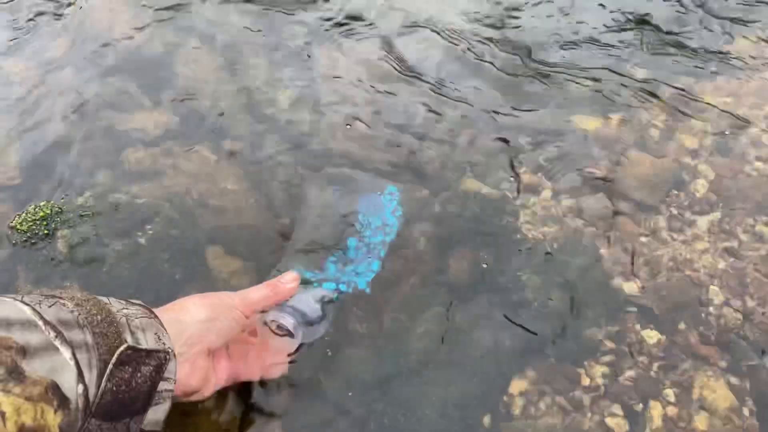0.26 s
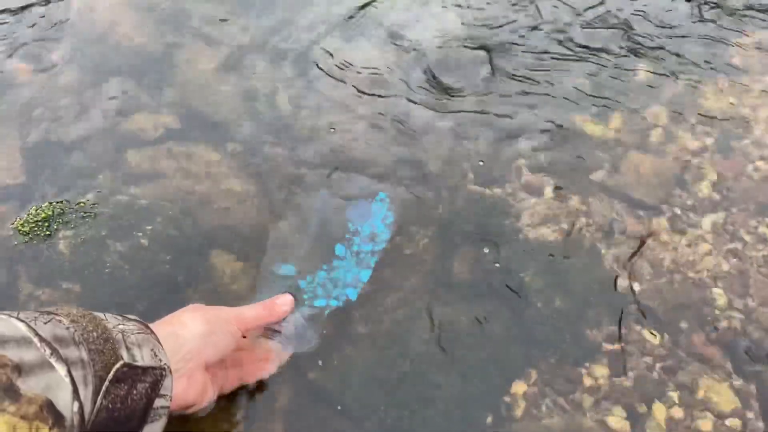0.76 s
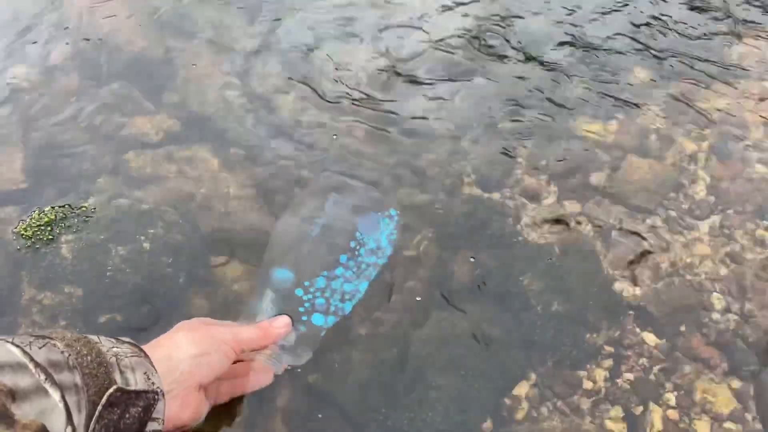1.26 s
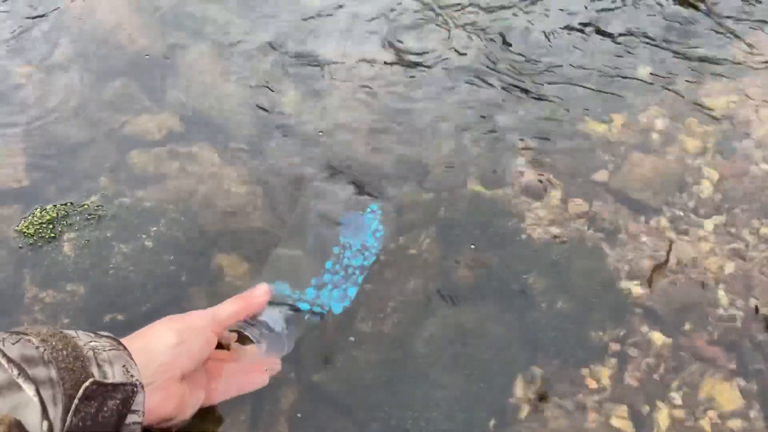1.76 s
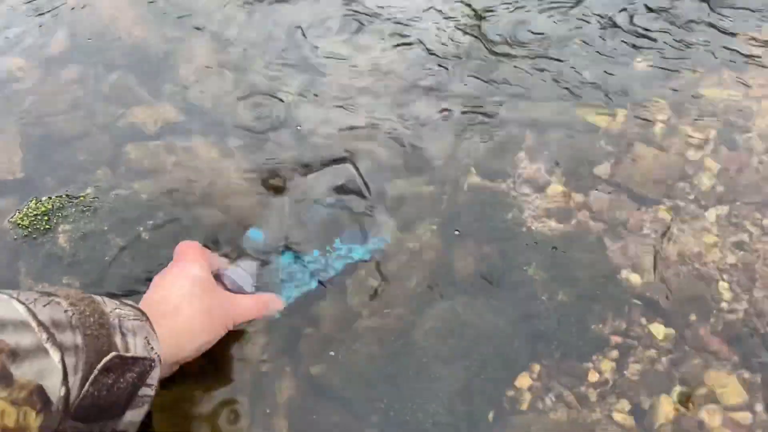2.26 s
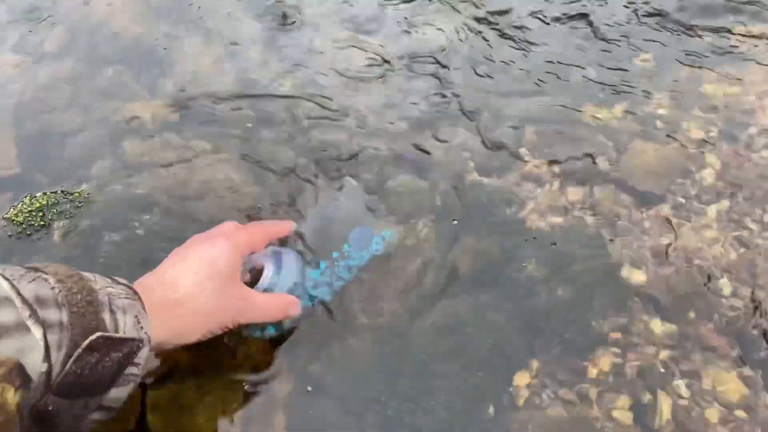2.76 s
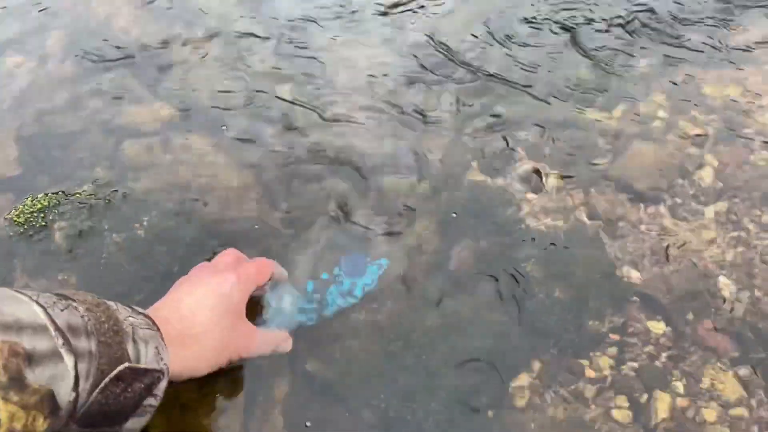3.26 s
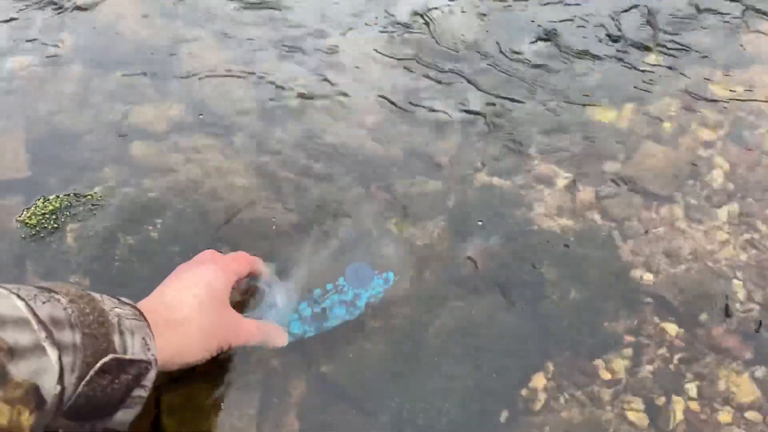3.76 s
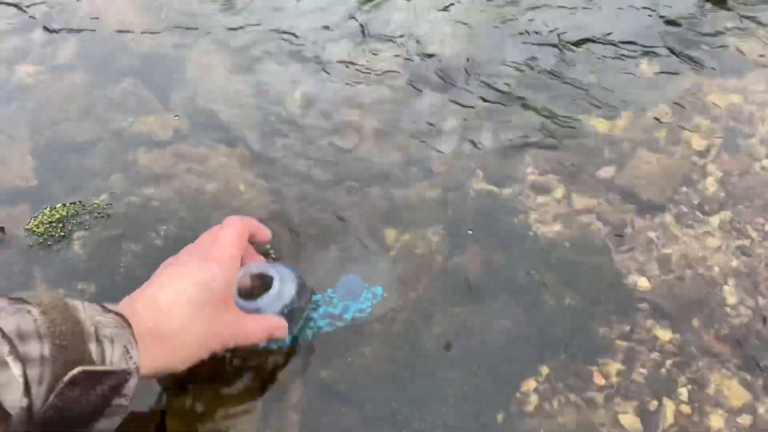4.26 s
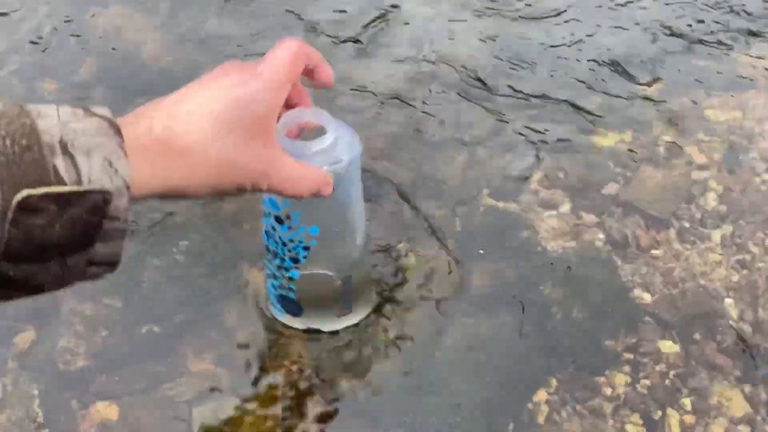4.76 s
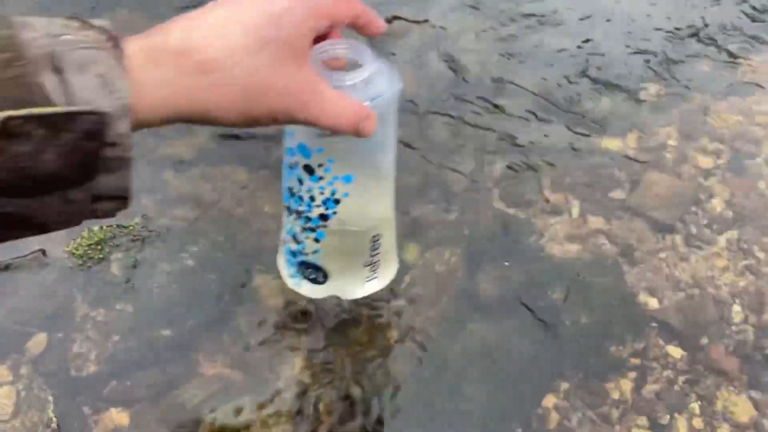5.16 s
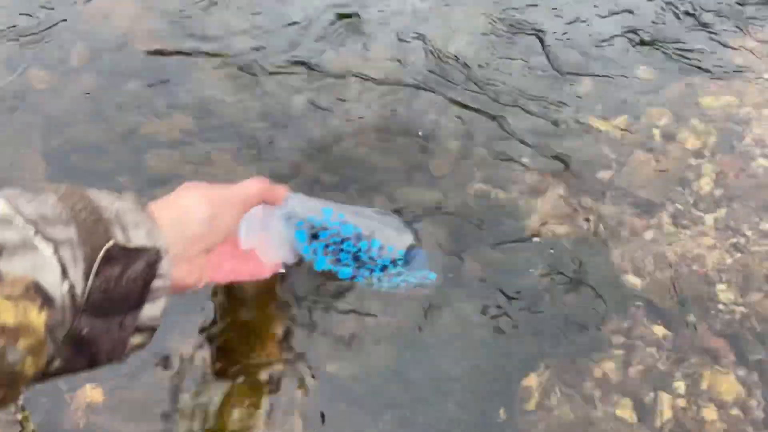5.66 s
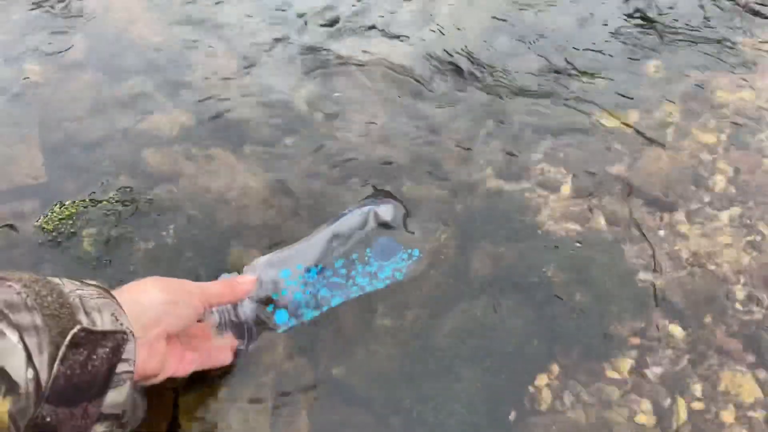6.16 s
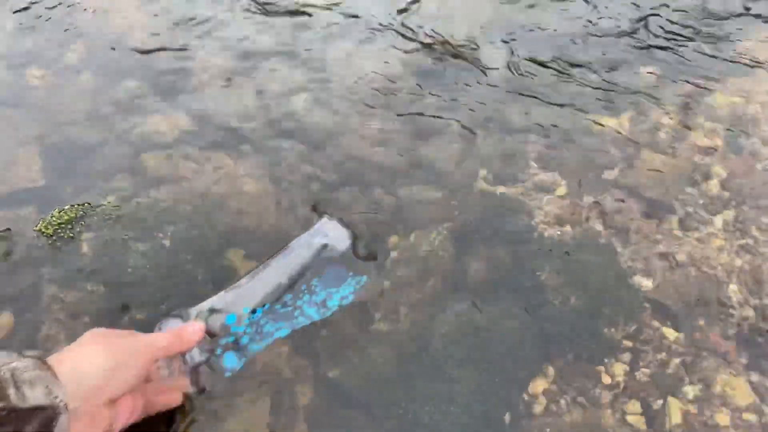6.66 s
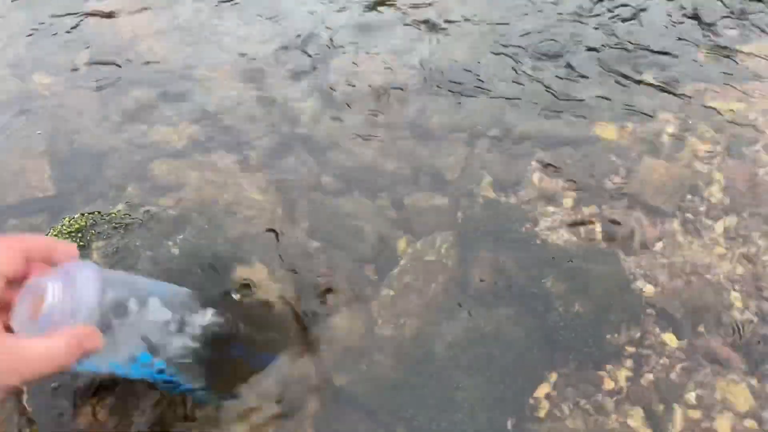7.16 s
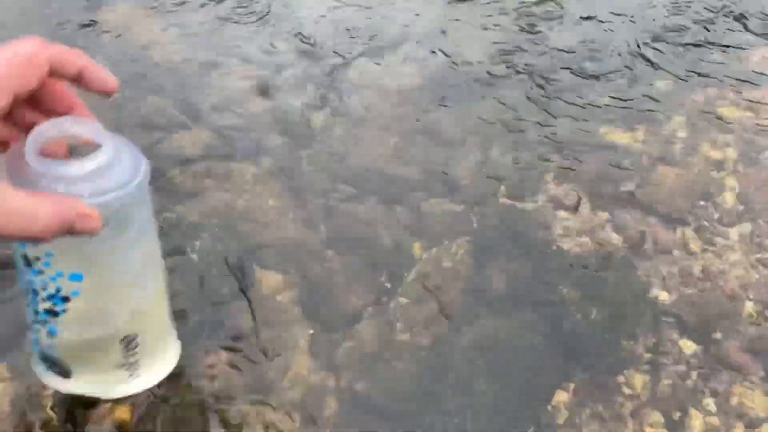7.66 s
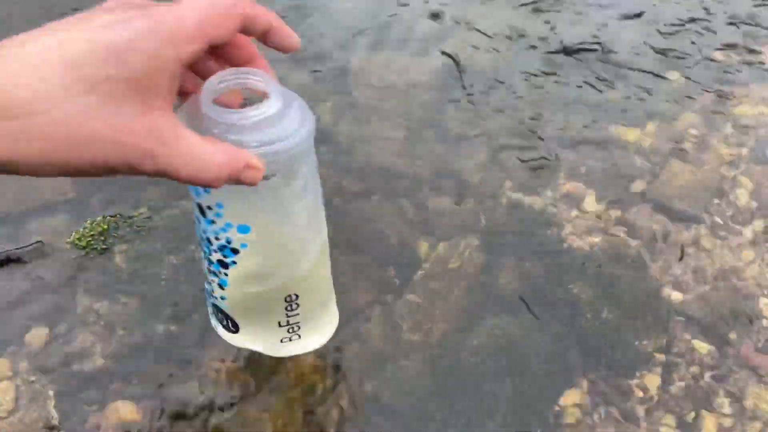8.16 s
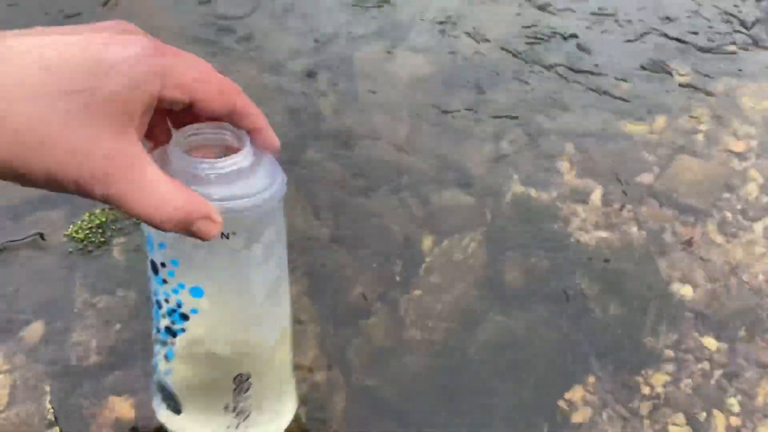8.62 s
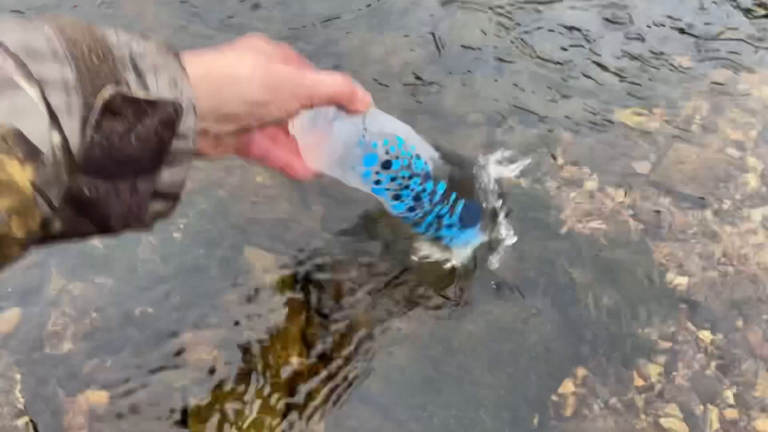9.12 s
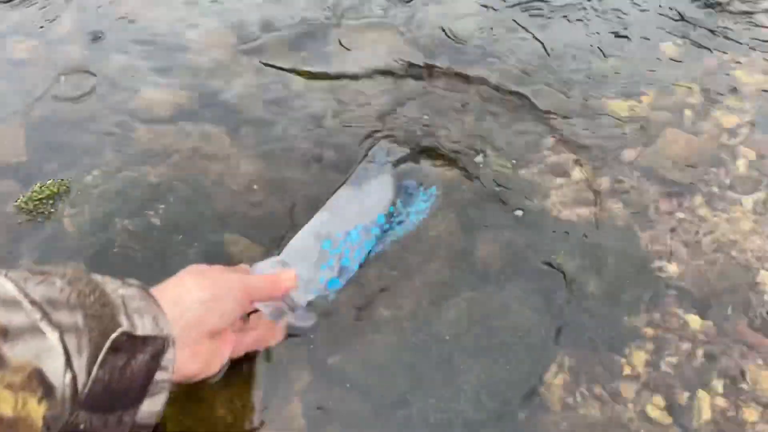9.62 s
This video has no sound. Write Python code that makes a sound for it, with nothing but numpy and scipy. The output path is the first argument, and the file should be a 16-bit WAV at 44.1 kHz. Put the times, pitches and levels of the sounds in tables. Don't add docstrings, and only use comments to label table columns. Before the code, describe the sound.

Close bubbling stream water with a sharp early knock, light splashes as a soft flask is dipped and lifted, and heavy wind buffeting later.

```python
import sys
import numpy as np
from scipy import signal
from scipy.fft import rfft, irfft
from scipy.io import wavfile
from scipy.ndimage import uniform_filter1d, minimum_filter1d

SR = 44100
rng = np.random.default_rng(int(sys.argv[2]) if len(sys.argv) > 2 else 0)


def store_pcm(level_fs):
    pcm = np.round(np.clip(level_fs, -1, 1) * 32767).astype(np.int16)
    wavfile.write(sys.argv[1], SR, np.atleast_2d(pcm).T)


def magnitude_from_level(level_db):
    exponent = np.asarray(level_db, float) / 20
    return 10 ** exponent


N = 436149


def evened(x):
    return x / np.sqrt(np.mean(x ** 2) + 1e-20)


def coloured(x, spectrum):
    hz = np.fft.rfftfreq(N, 1 / SR)
    point_hz, point_db = np.transpose(spectrum)
    gain_db = np.interp(np.log(hz + 1), np.log(point_hz), point_db, -90, -90)
    return evened(irfft(rfft(x) * magnitude_from_level(gain_db), N))


def curve(rows, column):
    rows = np.array(rows)
    return np.interp(np.arange(N) / SR, rows[:, 0], rows[:, column])


def flicker(hz, depth_db):
    knots = rng.standard_normal(N // 200 + 2)
    smooth = uniform_filter1d(knots, int(220 / hz) + 1)
    slow = evened(uniform_filter1d(smooth, int(110 / hz) + 1))
    wander = np.interp(np.arange(N) / 200, np.arange(len(knots)), slow)
    return evened(magnitude_from_level(depth_db * wander))


def add(mix, start_s, sound):
    part = mix[:, round(start_s * SR):][:, :sound.shape[-1]]
    part += sound[..., :part.shape[-1]]


# pitch_hz, right_lead_turns, likeness (0-1)
PORT_PAIR = [(0, 0, .8), (350, .05, .6), (550, .4, .7), (1150, .43, .7), (1450, .53, .9), (1900, .98, .6),
             (2800, 1.08, .7), (3300, 1.43, .6), (4700, 2.0, .85), (5700, 2.4, .3), (6500, 3.07, .75),
             (8200, 3.5, .93), (11600, 4.0, .93), (14800, 4.5, .93)]


def ports(near, other=None):
    hz = np.fft.rfftfreq(N, 1 / SR)
    point_hz, lead_turns, likeness = np.transpose(PORT_PAIR)
    right = rfft(near) * np.exp(2j * np.pi * np.interp(hz, point_hz, lead_turns))
    if other is not None:
        same = np.interp(hz, point_hz, likeness)
        right = same * right + np.sqrt(1 - same ** 2) * rfft(other)
    return np.array([near, irfft(right, N)])


def bubbles(lo_hz, hi_hz, per_s, cycles, spread_db, count=24):
    out = np.zeros(N)
    size = magnitude_from_level(spread_db * np.minimum(rng.exponential(1, N), 5))
    size = size * (rng.random(N) < per_s / SR)
    kind = rng.integers(0, count, N)
    for k, hz in enumerate(np.geomspace(lo_hz, hi_hz, count)):
        u = np.arange(int(3 * cycles * SR / hz)) * hz / SR / cycles
        rising = np.sin(2 * np.pi * cycles * (u + .012 * u ** 2))
        grain = u ** 2 * np.exp(-4 * u) * rising
        out += signal.oaconvolve(size * (kind == k), grain * hz / 1000)[:N]
    return evened(out)


def water(lo_hz, hi_hz, per_s, cycles, spread_db, wash):
    return bubbles(lo_hz, hi_hz, per_s, cycles, spread_db) + wash * rng.standard_normal(N)


# pitch_hz, level_db (per Hz)
FIZZ_COLOUR = [(150, -63), (220, 13.5), (900, -3.5), (1150, 8), (1500, 6.5), (2000, 3.5), (2600, 1),
               (3300, -4.5), (4500, -5), (6000, -13.5), (7800, -14.5), (11500, -19.5), (14800, -22),
               (16500, -9)]
# pitch_hz, level_db (per Hz)
CHURN_COLOUR = [(120, -30), (200, 9.5), (300, -8), (500, 4.5), (850, 5), (1100, -12)]
# start_s, breeze_db, stir_db
WEATHER_COURSE = [(0, -53, -39), (.75, -50, -45), (.85, -55.5, -50.5), (1.25, -66, -56), (1.7, -60, -49),
                  (2.3, -58, -38), (2.9, -54, -40.5), (3.3, -41.5, -39.5), (4.2, -49.5, -38),
                  (5.1, -56, -37), (5.6, -42.5, -39.5), (5.85, -61, -38), (6.25, -50, -39),
                  (6.85, -45, -37.5), (7.0, -58, -35.5), (8.3, -46, -46), (8.9, -48.5, -44),
                  (9.89, -47, -40)]


def brook():
    churn_top_db = -44.5
    fizz, churn = [], []
    for _ in "LR":
        spatter = 1.69 * bubbles(5180, 15200, 5000, 4.1, 1.8, count=10)
        fizz.append(coloured(water(885, 6977, 2500, 14.5, 3.92, 1.52) + spatter, FIZZ_COLOUR))
        churn.append(coloured(water(181.5, 989.6, 300, 12.0, 1.77, 0.79), CHURN_COLOUR))
    stir_db = curve(WEATHER_COURSE, 2)
    fizz_db = -47 + 0.077 * (stir_db - churn_top_db)
    churn_db = np.minimum(stir_db, churn_top_db) + 3.0
    balance = magnitude_from_level(np.array([[.6], [-.6]]))
    fizz = ports(*fizz) * balance * magnitude_from_level(fizz_db) * flicker(30, 1.0)
    return fizz + ports(*churn) * magnitude_from_level(churn_db) * flicker(2.2, 0.37)


# start_s, length_s, rumble_db, rushing_db
WIND_PUFFS = [(0, 0.1, -40.5, -50), (0.12, .06, -41, -50), (1.0, .2, -55, -60), (1.8, .1, -60, -40),
              (5.0, .08, -55, -38), (7.5, .09, -44, -50), (8.45, .2, -42, -60), (0.524, 0.23, -49, -42.5),
              (3.31, .09, -36, -41), (3.46, 0.4, -41, -56), (3.912, 0.17, -36, -40), (4.088, 0.1, -35, -55),
              (4.329, 0.09, -35.5, -41), (4.6, 0.15, -34.5, -59), (4.847, 0.063, -38, -44),
              (5.2, 0.08, -32, -61), (5.36, 0.1, -36, -50), (5.685, 0.097, -51, -39), (6.2, .08, -42, -45),
              (6.31, .04, -30, -36), (6.59, .05, -35, -36), (6.72, .04, -38, -40), (6.81, .04, -38, -42),
              (6.395, 0.12, -29.5, -55), (6.52, 0.06, -33, -38), (6.65, 0.045, -29, -40),
              (6.764, .035, -31, -49), (6.863, .035, -35, -49), (7.085, 0.06, -54, -32.5),
              (7.68, 0.075, -31, -32.5), (7.86, 0.17, -36.5, -34), (8.03, .2, -32, -30),
              (8.4, 0.04, -36, -41), (8.67, .1, -37.5, -57), (8.959, 0.092, -43, -34),
              (9.207, 0.041, -43, -40), (9.507, .12, -36.5, -38), (9.68, 0.075, -50, -40),
              (9.843, 0.043, -41, -47)]


def puffs(column):
    rise_s, fall_s = 0.056, 0.016
    t, power = np.arange(0, N, 64) / SR, 0
    for row in WIND_PUFFS:
        start_s, length_s = row[:2]
        rise = (t - start_s) / rise_s + .5
        fall = (start_s + length_s - t) / fall_s + .5
        shape = np.clip(np.minimum(rise, fall), 0, 1)
        power = power + magnitude_from_level(2 * row[column]) * np.sin(np.pi / 2 * shape) ** 4
    return np.interp(np.arange(N) / SR, t, power)


# pitch_hz, level_db (per Hz)
RUMBLE_COLOUR = [(15, -42), (35, -4.5), (60, 5.5), (100, 1.5), (160, -5), (260, -16), (500, -44)]
# pitch_hz, level_db (per Hz)
GUST_COLOUR = [(100, -18.5), (220, -3.5), (400, -13.5), (700, -19), (1200, -31.5)]
# start_s, peak_db,
# pitch_hz, length_cycles
PORT_EDDIES = [(0.554, -26, 65.4, 0.91), (0.651, -24.5, 191, 5.6), (0.83, -36, 278, 2.8),
               (1.053, -33, 217, 2.7), (2.763, -27.5, 197, 3.9), (3.332, -18, 116, 1.8),
               (3.38, -15.5, 96, 1.5), (3.669, -27, 157, 2.2), (3.929, -21, 229, 4.8),
               (4.341, -25, 53.4, 1.3), (4.706, -25, 104, 1.2), (4.848, -24.5, 84.4, 1.6),
               (6.293, -12.5, 175, 2.6), (6.422, -14, 84, 1.9), (6.558, -11.5, 68, 1.1),
               (6.866, -11.5, 99.6, 1.15), (7.151, -24, 110, 1.7), (7.686, -15, 128, 3.3),
               (7.727, -7.5, 88, 0.87), (7.851, -19, 72, 2), (8.087, -13, 127.5, 2.2),
               (8.394, -18, 88, 1.3), (8.551, -21, 152, 2.3), (8.952, -21, 109.5, 2),
               (7.245, -24, 125, 1.6), (8.192, -12, 100, 1.5), (9.002, -22, 165, 1.7),
               (9.226, -19, 170, 1.2), (9.216, -25, 92.5, 1.8),
               (7.642, -21, 227, 1.2), (7.692, -11.5, 247, 1.9), (7.703, -24, 266, 1),
                (7.733, -11, 350, 1.4), (7.741, -4, 272, 1.37), (7.841, -14, 202, 0.95),
                (7.874, -14.5, 259, 1.4), (7.91, -19.5, 231, 1.4), (7.951, -11, 335, 1.94),
                (7.982, -12, 263, 0.79), (8.003, -15, 262, 1.5), (8.061, -10, 430, 1.6),
                (8.083, -11, 208, 2.4), (8.095, -10, 433, 1.6), (8.106, -10.5, 306, 2.6),
                (8.119, -24, 265, 1.5), (8.137, -21, 410, 1.1), (8.15, -15.5, 205, 2.7),
                (8.163, -6, 420, 2.2), (8.19, -16, 296, 1.3), (8.209, -16, 230, 1.2), (7.693, -22, 560, 3),
                (7.857, -22, 450, 2), (7.873, -20, 540, 2.5), (7.909, -15, 480, 1.6),
                (7.968, -17, 240, 1.5), (8.025, -20, 300, 2.5), (8.112, -13, 520, 2.5),
                (8.084, -20, 520, 2), (8.135, -22, 500, 2.5), (8.978, -26, 330, 3)]


def wind():
    rumble = coloured(rng.standard_normal((2, N)), RUMBLE_COLOUR)
    gust = coloured(rng.standard_normal((2, N)), GUST_COLOUR)
    rumble_power = magnitude_from_level(2 * curve(WEATHER_COURSE, 1)) + puffs(column=2)
    stir_power = magnitude_from_level(2 * curve(WEATHER_COURSE, 2)) - magnitude_from_level(2 * -45.5)
    gust_power = np.maximum(stir_power, 0) + puffs(column=3)
    rumble = rumble[0] + np.outer([1, -1], 0.33 * rumble[1])
    gust = gust[0] + np.outer([1, -1], 0.66 * gust[1])
    out = rumble * np.sqrt(rumble_power) * flicker(16, 2.2)
    out = out + gust * np.sqrt(gust_power) * magnitude_from_level(-5.5) * flicker(70, 3.4)
    eddies = PORT_EDDIES
    for (start_s, db, hz, cycles), (turn, lag) in zip(eddies, rng.random((len(eddies), 2))):
        u = np.arange(int(2 * cycles * SR / hz)) * hz / SR / cycles
        phase = 2 * np.pi * (cycles * u + turn + np.outer([1, -1], 0.077 * (lag - .5)))
        steepness = 0.38 * (hz > 190)
        swirl = np.sin(phase) + steepness * np.sin(1.604 * phase)
        add(out, start_s, magnitude_from_level(db - 8.5) * np.sin(np.pi * u / 2) ** 2 * swirl)
    return out


# start_s, peak_db, pitch_hz (bubble), crack_db (re peak), length_s
CRACKING_DROPS = [(0.083, -27, 3270, -2, 0.0092), (.094, -32, 4230, 0, 0.0065),
                  (.102, -25, 8450, -3, 0.003), (0.273, -37, 4500, -20, .005), (1.674, -39, 4600, 5, .0026),
                  (2.982, -28, 4500, 4, .0035), (3.073, -39, 5360, 3, 0.0028),
                  (5.374, -26, 11000, -8, .0015), (4.603, -33, 3000, 0, .002),
                  (4.611, -22, 4500, 5.5, 0.0025), (4.616, -22, 5800, -6, .003),
                  (5.539, -31, 5200, -5, .004), (5.792, -28, 5600, -3, .003),
                  (5.414, -29, 8550, -14, .0025), (5.5, -28, 4500, -8, 0.0036),
                  (5.541, -36, 6500, 0, .0025), (5.788, -26, 5330, -6, 0.003),
                  (5.799, -23, 5940, -7, 0.003), (8.001, -28, 2520, -16, 0.0037),
                  (8.034, -20, 3400, -25, 0.0046), (9.068, -29, 5440, -5, 0.0024),
                  (9.178, -22.5, 7000, -7, 0.0054), (9.21, -22, 2700, -6, 0.004),
                  (9.217, -22, 3240, -3, 0.0029), (9.297, -25, 3700, -6, 0.0059)]
# start_s, peak_db, pitch_hz (bubble), spray_db (re peak)
SPRAY_FLECKS = [(.083, -27, 5920, -10), (.295, -43, 8950, -14), (1.338, -33, 14000, -12),
                (1.361, -33, 4430, -13), (2.899, -38, 6900, -10), (4.504, -46, 14000, -10),
                (4.518, -43, 6800, -8), (4.575, -42, 10000, -10), (4.586, -43, 8000, -3),
                (4.61, -39, 4800, -1), (4.596, -35, 10900, -6), (4.707, -38, 4800, -5),
                (5.373, -33, 13200, 3), (5.382, -33, 4600, -16), (7.091, -34, 5400, -13),
                (7.098, -46, 12000, -6), (7.106, -40, 7250, -3), (7.19, -37, 9400, -9),
                (7.203, -40, 14500, -7), (9.19, -35, 7500, -8), (9.193, -28, 5900, -16),
                (9.318, -35, 4500, -7)]


def splashes():
    out, t = np.zeros((1, N)), np.arange(1500) / SR
    fine = signal.butter(3, [8000, 15500], "band", fs=SR, output="sos")
    coarse = signal.butter(2, [1500, 8000], "band", fs=SR, output="sos")
    rows = [(s, db, hz, -22, crack_db, length_s) for s, db, hz, crack_db, length_s in CRACKING_DROPS]
    rows += [(s, db, hz, spray_db, -18, .004) for s, db, hz, spray_db in SPRAY_FLECKS]
    noises = rng.standard_normal((len(rows), 1500))
    for (start_s, db, hz, spray_db, crack_db, length_s), noise in zip(rows, noises):
        u = t / np.clip(length_s, .001, .02)
        spray = magnitude_from_level(spray_db + 1.0) * signal.sosfilt(fine, noise) * np.exp(-(u / .9) ** 2)
        impact = noise * np.exp(-t / .0015) + 2.5 * (t == t[20])
        crack = magnitude_from_level(crack_db) * signal.sosfilt(coarse, impact)
        wobble = 1 + 3.8 * uniform_filter1d(noise[::-1], size=30)
        ring = .5 * wobble * np.sin(2 * np.pi * hz * t * (1 + 0.014 * u)) * np.exp(-1.5 * u)
        onset = 1 - np.exp(-t / .00025)
        add(out, start_s, magnitude_from_level(db) * onset * (spray + crack + ring))
    return ports(out[0]) * magnitude_from_level(np.array([[1.2], [-1.2]]))


# start_s, peak_db, pitch_hz, length_s, pitch_rise (per length)
AIR_POCKETS = [(9.176, -37, 1420, 0.0025, 0.005), (.064, -40, 2400, .006, .003),
               (.103, -38, 2300, .002, .003), (9.271, -41, 2500, .003, .003), (5.45, -40, 2100, .002, .003),
               (9.199, -42, 2450, .003, .005), (9.018, -42, 1700, .004, .015),
               (9.021, -38, 590, .012, .003), (9.069, -38, 1080, .0015, .01), (7.395, -39, 495, .013, .005),
               (7.18, -41, 590, .01, -.02), (7.295, -41, 440, .012, .01), (7.107, -38, 270, .01, .01),
               (7.28, -36, 215, .012, .01), (2.169, -41.5, 2250, .003, -0.0077),
               (2.189, -39.5, 2220, .004, 0.0066), (2.901, -33, 550, 0.0024, -0.011),
               (2.9, -39, 1140, .002, -0.025), (2.979, -27, 890, 0.0026, -0.004),
               (2.985, -37, 2630, 0.0016, -0.011), (3.089, -42, 1800, .004, 0.044),
               (3.248, -39, 470, 0.023, 0.055), (7.097, -38, 570, 0.012, 0.02),
               (4.603, -37, 1790, 0.0034, -0.012), (4.617, -39, 1720, 0.0064, -0.006),
               (5.449, -30.5, 860, 0.0023, 0.027), (5.987, -31.5, 980, 0.001, 0.0066),
               (7.375, -35, 860, 0.0031, 0.0052), (7.804, -40.5, 830, 0.01, 0.0077),
               (8.992, -33, 750, 0.0028, 0.023), (9.069, -36, 1750, 0.0015, -0.0058),
               (9.18, -34, 2540, .002, 0.018), (9.191, -34, 830, 0.006, 0.11),
               (9.217, -32, 2050, .002, -0.03), (9.222, -38, 1670, 0.007, 0.03),
               (9.131, -38, 560, .012, .005), (9.151, -36, 700, .005, .03), (9.445, -38, 538, 0.018, 0.023)]


def glugs():
    out, t = np.zeros((2, N)), np.arange(6000) / SR
    port_phase = np.array([[0], [.9]])
    for start_s, db, hz, length_s, rise in AIR_POCKETS:
        u = t / np.clip(length_s, .001, .02)
        ring = np.sin(2 * np.pi * hz * t * (1 + rise * u) + port_phase)
        add(out, start_s, magnitude_from_level(db + 9.0) * (1 - np.exp(-4 * u)) * np.exp(-u) * ring)
    return out


# low_hz, high_hz, half (0 mid, 1 side), share (of moments)
MUTED_BANDS = [(7520, 8980, 0, 1), (13700, 23000, 0, 1), (10300, 13000, 1, 1), (15750, 23000, 1, 1),
               (6250, 6750, 1, .3), (4700, 5000, 1, .12)]
# start_s, kept_to_hz
SPARED_MOMENTS = [(.1, 16000), (.112, 15800), (.3, 15800), (.41, 15800), (1.065, 10000), (1.338, 16400),
                  (2.9, 15800), (2.983, 16500), (4.51, 15800), (4.58, 15000), (4.61, 16500), (5.375, 16500),
                  (5.415, 15800), (5.54, 15800), (5.79, 15800), (7.1, 15800), (7.2, 15800), (8.034, 14200),
                  (9.068, 15800), (9.18, 14200), (9.32, 15500), (9.34, 15000)]
# pitch_hz, share (of patches)
MUTED_PATCHES = [(2000, 0), (5000, .02), (9000, .07), (14000, .13)]


def thinned(pair):
    halves = np.array([pair[0] + pair[1], pair[0] - pair[1]]) / 2
    hz, t, halves = signal.stft(halves, SR, nperseg=2048)
    spared_hz = np.max([top * (abs(t - s) < .0125) for s, top in SPARED_MOMENTS], axis=0)
    keep = np.ones(halves.shape)
    for lo_hz, hi_hz, half, share in MUTED_BANDS:
        on, low, high = np.repeat(rng.standard_normal((len(t), 3)), 2, axis=0)[:len(t)].T
        low_edge = lo_hz + 170 * np.round(.6 * low)
        high_edge = hi_hz + 170 * np.round(.6 * high)
        inside = (hz[:, None] > np.maximum(low_edge, spared_hz)) & (hz[:, None] < high_edge)
        keep[half] *= 1 - inside * (on <= np.quantile(on, share))
    cells = rng.random((2, len(t) // 3 + 1, len(hz) // 6 + 1))
    cells = cells.repeat(3, axis=1).repeat(6, axis=2)[:, :len(t), :len(hz)]
    holes = cells.transpose(0, 2, 1) < np.interp(hz, *np.transpose(MUTED_PATCHES))[:, None]
    kept = halves * keep * ~(holes & (spared_hz == 0))
    mid, side = signal.istft(kept, SR, nperseg=2048)[1][:, :N]
    return np.array([mid + side, mid - side])


# start_s, peak_db, first_half_wave_s (sign is direction), swell_steepness, die_away_s,
# shell_ring_db, tick_db
CASE_KNOCKS = [
    (.4097, 2.5, .0015, 1.3, .0036, -4, -17),
    (1.0637, -20.5, -.00084, .2, .0025, -40, -40),
]


def knocks():
    half_wave_growth = 1.535
    out, t = np.zeros((2, N)), np.arange(1, 4000) / SR
    for start_s, db, first_s, steepness, die_s, ring_db, tick_db in CASE_KNOCKS:
        late = t / np.array([[1.08], [1]])
        u = late / abs(first_s)
        chirp = np.cos(np.pi * np.log(u) / np.log(half_wave_growth))
        bend = np.sign(first_s) * chirp * u ** 3 / (.3 + u ** 3)
        swell = (late / die_s) ** steepness * np.exp(-late / die_s)
        add(out, start_s, magnitude_from_level(db + 3.5) * bend * (swell + 0.1 * np.exp(-late / 0.025)))
        d = t - .01
        flip = 1.12 * np.exp(-(d / .0004) ** 2) - .12 * np.exp(-(d / .01) ** 2)
        ring = np.where(d < 0, np.exp(d / .0018), flip) * np.cos(2 * np.pi * 1857 * d)
        tick = np.exp(-(d / 0.0004) ** 2) * np.sin(2 * np.pi * 5600 * d)
        shell = (magnitude_from_level(ring_db) * ring + magnitude_from_level(tick_db) * tick) * np.array([[1], [.04]])
        snap_s = d - np.array([[.0004], [.00033]])
        snap = np.exp(-(snap_s / .00027) ** 2) * np.cos(2 * np.pi * 2250 * snap_s)
        add(out, start_s - .0094, shell - magnitude_from_level(db - np.array([[7], [12]])) * snap)
    return out


def scene():
    stream = brook() + splashes() + glugs()
    return thinned(stream) + wind() + knocks()


def roll_off(x):
    return signal.sosfilt(signal.butter(12, 16510, fs=SR, output="sos"), x)


def record(dry):
    power = uniform_filter1d((dry ** 2).mean(0), 400, origin=199)
    power_db = 10 * np.log10(abs(power) + 1e-12)
    held_db = -minimum_filter1d(-power_db, size=4001, origin=2000)
    fall_db = np.arange(N) * 170.0 / SR
    level_db = np.maximum.accumulate(held_db + fall_db) - fall_db
    over_db = np.maximum(level_db + 16, 0)
    limited = dry / magnitude_from_level(uniform_filter1d(over_db, 600, origin=299))
    mix = signal.oaconvolve(limited, signal.firwin(201, 16400, fs=SR)[None], "same")
    return roll_off(mix)


dry = scene()
out = record(dry)
store_pcm(out)
```